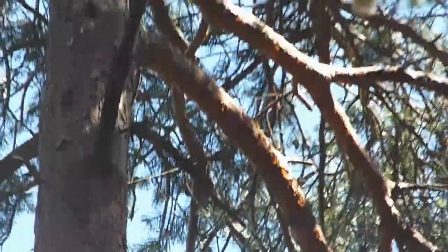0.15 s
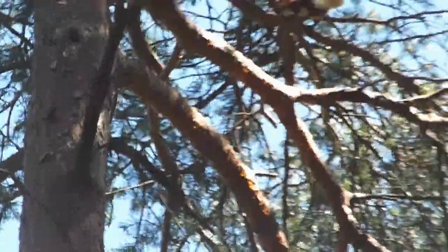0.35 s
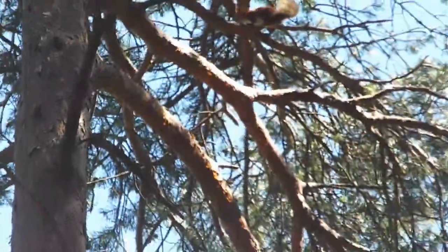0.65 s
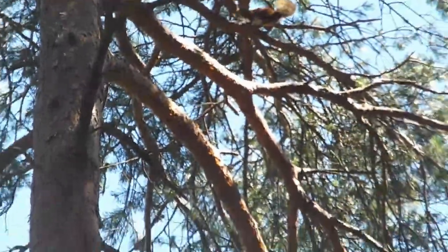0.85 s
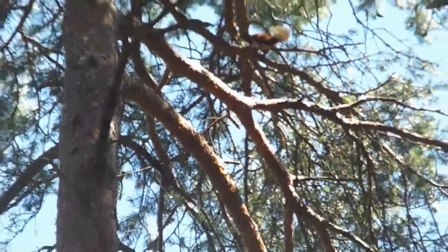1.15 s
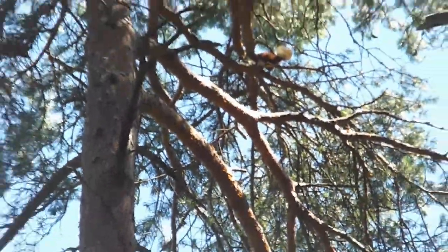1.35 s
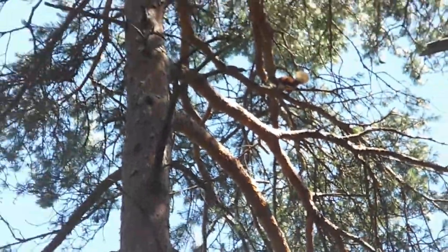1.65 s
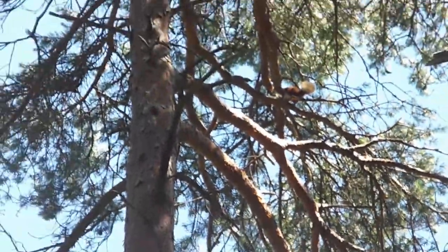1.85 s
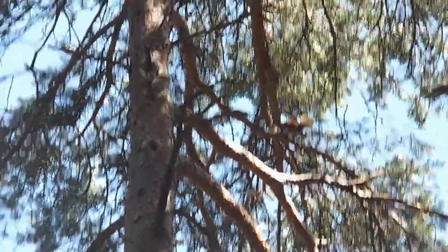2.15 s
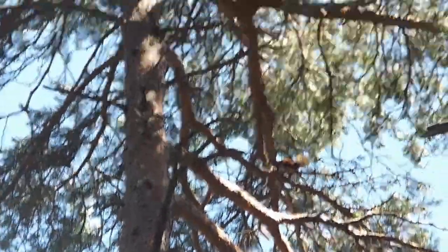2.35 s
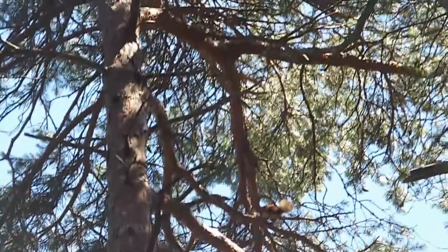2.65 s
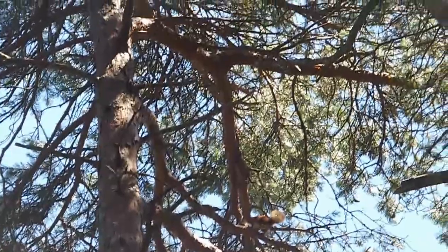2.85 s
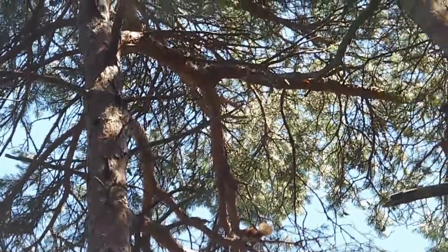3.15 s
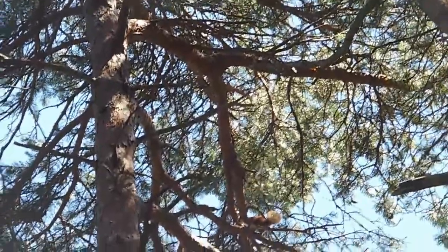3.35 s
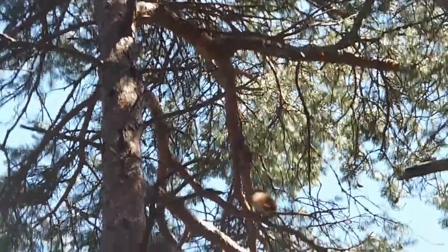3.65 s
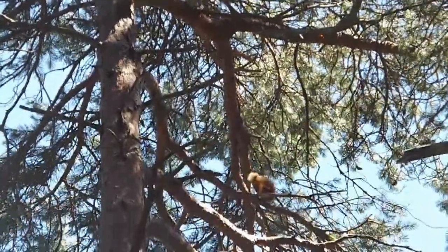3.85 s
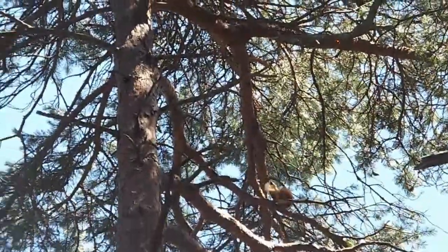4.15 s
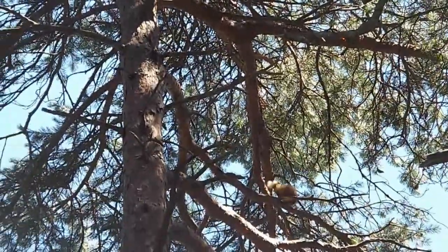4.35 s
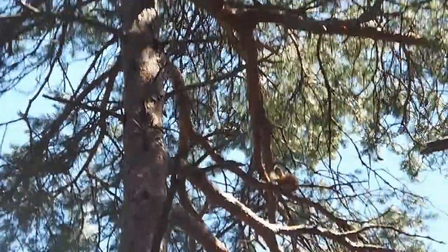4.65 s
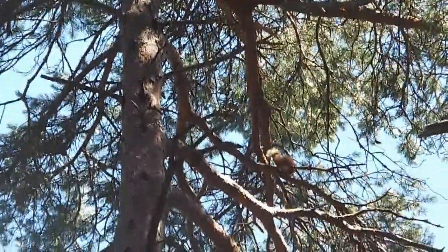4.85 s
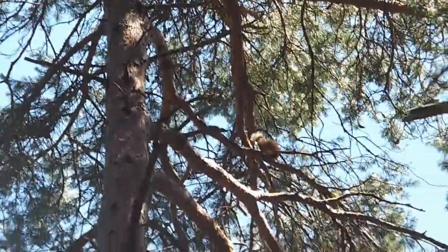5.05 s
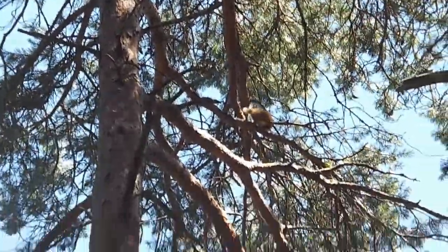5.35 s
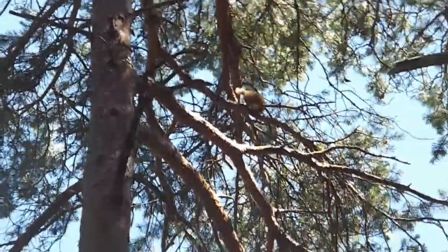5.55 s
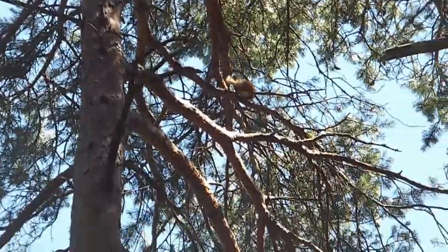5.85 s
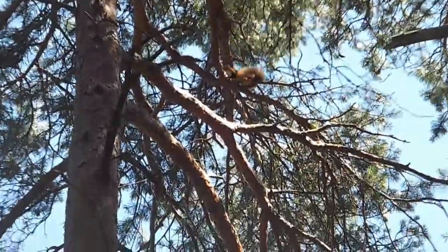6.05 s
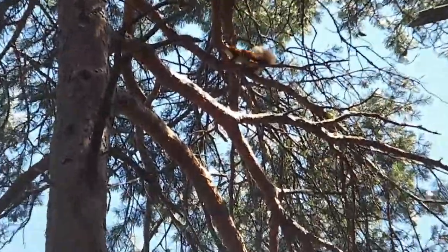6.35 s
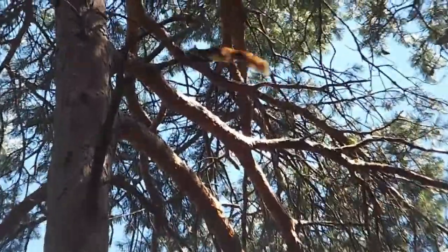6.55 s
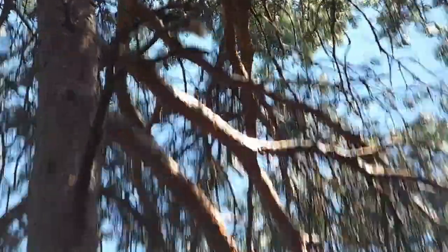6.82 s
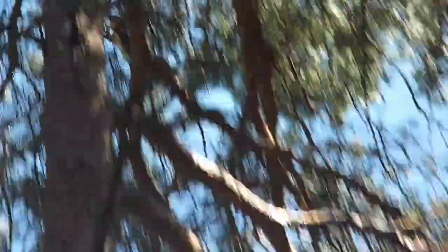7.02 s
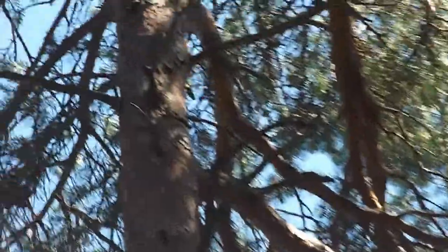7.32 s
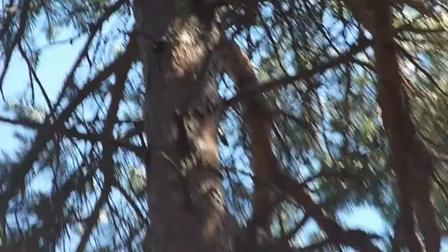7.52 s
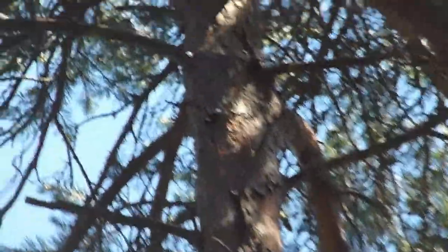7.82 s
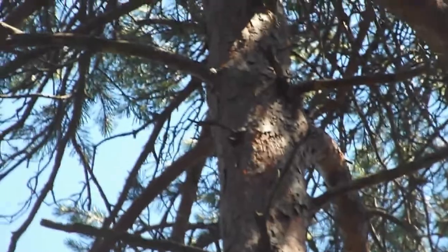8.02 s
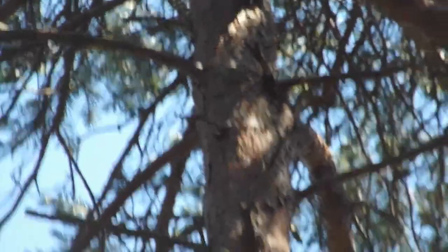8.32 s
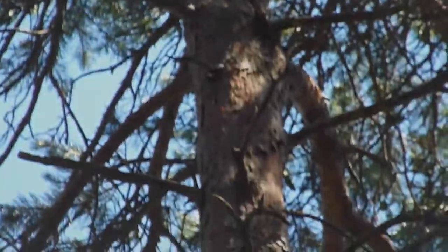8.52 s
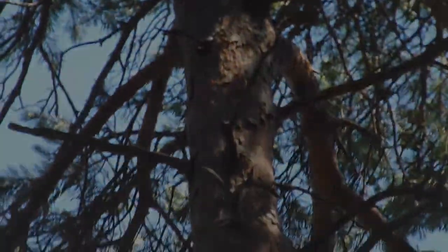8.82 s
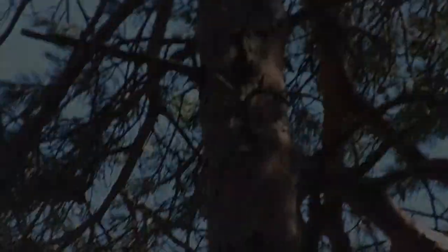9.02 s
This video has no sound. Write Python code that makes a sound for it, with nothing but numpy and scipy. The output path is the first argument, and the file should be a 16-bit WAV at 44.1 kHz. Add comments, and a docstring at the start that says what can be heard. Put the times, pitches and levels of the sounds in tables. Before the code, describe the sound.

Very close, a small lens motor whirs roughly with gritty gear ticks for about a second and a half, then stops. Thin high birds whistle with woodland echo over soft air and hiss while hands rub, bump and creak the plastic housing. The motor whirs again for nearly two seconds and ends in a loud sharp click, followed by light taps and birds.

```python
"""Under the pines a camera zooms out and back in: rough noise pulsed by gear teeth rings the lens barrel.
Gear ticks are short noise bursts; the end stop is a sharp, clipped click of struck modes.
The housing clicks, creaks, pings, rustles and thuds in the hand; a quiet harmonic buzz sets in late.
Small birds whistle thinly, as warbled sine glides with a noisy echo, over woodland air, hiss and whine."""
import sys
import numpy as np
from scipy import signal
from scipy.fft import rfft, irfft, next_fast_len
from scipy.io import wavfile
from scipy.ndimage import uniform_filter1d, map_coordinates

SR = 44100
rng = np.random.default_rng(int(sys.argv[2]) if len(sys.argv) > 2 else 0)


def int16_out(signal):
    """Quantize to a 16-bit WAV file."""
    q = np.round(np.clip(np.atleast_2d(signal).T, -1, 1) * 32767)
    wavfile.write(sys.argv[1], SR, q.astype(np.int16))


N = 404838
TOP_HZ = 15900  # band limit


def amp(db):
    """Decibels to gain."""
    return 10 ** (np.asarray(db) / 20)


def unit(x):
    """x at rms 1."""
    return x / np.sqrt(np.mean(x ** 2) + 1e-20)


def along(points, hz):
    """(Hz, value) points read on a log frequency axis."""
    f, v = np.transpose(points)
    return np.interp(np.log(hz + 1), np.log(f + 1), v)


def tilt(hz, db_per_octave):
    """Spectral slope in dB, flat below 800 Hz and above 8 kHz."""
    return db_per_octave * np.log2(np.clip(hz, 800, 8000))


def wobble(rate, size=N):
    """A smooth random curve, rate knots a second."""
    knots = rng.standard_normal(int(size * rate / SR) + 4)
    return map_coordinates(knots, [np.arange(size) * rate / SR])


def filtered(x, response):
    """x through a gain given as a function of frequency."""
    n = x.shape[-1]
    m = next_fast_len(n + 8192)
    return irfft(rfft(x, m) * response(np.fft.rfftfreq(m, 1 / SR)), m)[..., :n]


def noise(spectrum, size=N):
    """Two unrelated coloured noises, rms 1 over the pair."""
    white = rng.standard_normal((2, size))
    return unit(filtered(white, lambda hz: amp(along(spectrum, hz))))


def resonance(hz, centre, width):
    """Gain of one resonance with steep skirts."""
    return (hz * width) ** 2 / ((centre ** 2 - hz ** 2) ** 2 + (hz * width) ** 2)


def add(track, s, sound):
    """Mix a sound into a track at time s."""
    part = track[..., max(round(s * SR), 0):][..., :sound.shape[-1]]
    part += sound[..., :part.shape[-1]]


def no_bass(x, edge_hz=250):
    """High-pass: the small body radiates little low sound."""
    return signal.lfilter(*signal.butter(2, edge_hz, 'highpass', fs=SR), x)


def barrel(force):
    """The lens barrel carries vibration to each microphone with its own strengths."""
    # Barrel resonances. Each row: centre in Hz, width in Hz, left level in dB, right level in dB.
    barrel_modes = [(1000, 260, -11.5, -5), (1560, 1600, -10.5, -5), (2090, 190, 0, 0),
                    (2352, 290, 4, -2.5), (2810, 740, -3, -4), (3260, 1200, -10.5, -8.5),
                    (3964, 260, -18, -1.5), (4527, 470, -9.5, 1.5), (5670, 930, -13.5, -13),
                    (7060, 1230, -8.5, -2.5), (7660, 790, -6, -2.5), (8590, 990, -30, 1.5),
                    (9360, 900, -32, -0.5), (10600, 700, -18, -28), (11670, 950, -19.5, -14)]
    grid = np.linspace(0, SR / 2, 2048)
    power = 0
    for centre, width, left_db, right_db in barrel_modes:
        power = power + (amp([[left_db], [right_db]]) * resonance(grid, centre, width)) ** 2
    gains = np.sqrt(power)
    return unit(filtered(force, lambda hz: np.array([np.interp(hz, grid, side) for side in gains])))


def background():
    """Air in the trees, the idling lens drive, microphone hiss and a steady electronic whine."""
    # Air level over time. Each row: time in seconds, relative level in dB.
    air_levels = [(0.0, -59.5), (2.2, -61.5), (2.45, -60.5), (5.09, -61.5), (5.47, -60), (5.88, -62.5),
                  (6.26, -60.5), (9.18, -61)]
    # Air spectrum. Each row: frequency in Hz, density in dB per Hz.
    breeze_spectrum = [(25, -23), (80, -17), (150, -11), (250, -4), (450, 1), (800, 0), (1300, -4.5),
                       (2500, -13), (5000, -20), (10000, -17.5)]
    # Microphone self-noise spectrum. Each row: frequency in Hz, density in dB per Hz.
    hiss_spectrum = [(100, -3.5), (3000, 10.5), (7000, 5.5), (9000, 5.5), (12000, 2), (16000, -1.5)]
    # Left-right likeness of the air. Each row: frequency in Hz, correlation from -1 to 1.
    likeness = [(60, 0.82), (180, 0.93), (550, 0.72), (1650, 0.59), (4970, 0.35), (15000, -0.34)]
    t = np.arange(N) / SR

    def mid_side_gains(hz):
        angle = np.arccos(np.clip(along(likeness, hz), -1, 1)) / 2
        return np.array([np.cos(angle), np.sin(angle)])

    mid, side = filtered(noise(breeze_spectrum), mid_side_gains)
    air_db = np.interp(t, *np.transpose(air_levels)) + 4 + 0.88 * wobble(9.2)
    air = unit(np.array([mid + side, mid - side])) * amp(air_db)
    idle = amp(-64.0 + 2.4 * wobble(7.2)) * barrel(rng.standard_normal((2, N)))
    whine_hz = 11719 + 6 * wobble(30)
    whine = amp(-77) * np.sin(2 * np.pi * np.cumsum(whine_hz) / SR)
    return air + idle + amp(-57.5) * noise(hiss_spectrum) + whine


def buzz():
    """A quiet, even buzz: 13 harmonics of a slightly unsteady pitch."""
    # The buzz: start in seconds, pitch in Hz, relative level in dB.
    buzz_settings = (9.11, 274.5, -62.5)
    # Harmonic levels. Each row: frequency in Hz, level in dB.
    buzz_colour = [(275, 0), (820, -0.5), (1100, -4), (1400, -8), (1900, -8), (3200, -9), (4000, -20)]
    start, pitch_hz, db = buzz_settings
    t = np.arange(N) / SR
    turns = np.cumsum(pitch_hz * (1 + 0.0024 * wobble(30))) / SR
    tone = np.zeros(N)
    for k in range(1, 14):
        tone += amp(along(buzz_colour, k * pitch_hz)) * np.sin(2 * np.pi * (k * turns + rng.random()))
    return amp(db + 3.5) * tone * np.clip((t - start) / 0.03, 0, 1)


def note(length, first_hz, last_hz, depth_hz):
    """A thin sliding whistle with a quick warble and a finer random tremor."""
    warble_hz, tremor_hz, tremor_rate = 36.4, 30, 480  # mean rate; depth; knots a second
    u = np.linspace(0, 1, int(length * SR))
    cycles = warble_hz * rng.normal(1, 0.146) * length * u
    warble = np.sin(2 * np.pi * (cycles + rng.random()))
    tremor = tremor_hz * wobble(tremor_rate, size=SR)[:len(u)]
    pitch_hz = first_hz + (last_hz - first_hz) * u ** 0.87 + depth_hz * warble + tremor
    swell = np.sqrt(np.abs(np.sin(np.pi * u))) * amp(2.4 * wobble(95, size=SR)[:len(u)])
    return swell * np.sin(2 * np.pi * np.cumsum(pitch_hz) / SR)


def birds(wet_db=-6, t60=0.77):
    """Near notes and fainter answers, echoed by the trunks, over a band of distant calls."""
    # Nearest notes. Each row: start in seconds, length in seconds, first pitch in Hz, last pitch in Hz,
    # warble depth in Hz, level in dB.
    near_notes = [(0.836, 0.23, 7740, 7400, 70, -48.5), (1.878, 0.089, 4560, 4280, 40, -63),
                  (1.97, 0.14, 4220, 4060, 35, -69), (2.125, 0.14, 7320, 7120, 20, -56),
                  (2.31, 0.08, 7600, 7260, 120, -62), (2.39, 0.073, 7150, 7020, 30, -64),
                  (2.47, 0.056, 6750, 6350, 110, -61), (2.568, 0.077, 6950, 6480, 60, -57),
                  (2.643, 0.12, 7260, 6880, 45, -63), (2.809, 0.05, 6900, 7130, 60, -53),
                  (2.816, 0.09, 7650, 7100, 190, -57), (3.016, 0.1, 7000, 6800, 42, -58),
                  (3.03, 0.056, 7550, 7350, 140, -63), (3.197, 0.065, 8050, 7980, 25, -62),
                  (3.243, 0.07, 7000, 6780, 40, -60), (3.25, 0.15, 7360, 7400, 20, -65),
                  (3.415, 0.12, 7430, 7100, 15, -55), (3.65, 0.12, 7400, 7280, 20, -61.5),
                  (3.653, 0.06, 7700, 8100, 170, -58), (3.798, 0.16, 7900, 7630, 100, -62),
                  (4.01, 0.11, 7650, 7240, 70, -75), (4.285, 0.05, 7750, 7620, 60, -68),
                  (4.29, 0.12, 6950, 6830, 90, -69), (4.665, 0.044, 7950, 7600, 90, -57),
                  (4.694, 0.078, 7500, 7260, 70, -56), (4.817, 0.11, 7620, 7030, 110, -49.5),
                  (4.975, 0.11, 7420, 6950, 104, -50.5), (5.118, 0.096, 7540, 6980, 120, -51.5),
                  (5.284, 0.091, 7350, 7020, 74, -59), (5.48, 0.11, 7700, 7400, 90, -61),
                  (5.64, 0.11, 7700, 7400, 90, -65), (5.771, 0.15, 7450, 7260, 80, -67),
                  (8.037, 0.034, 7200, 6600, 55, -54), (8.094, 0.037, 7650, 7460, 110, -56),
                  (8.136, 0.066, 7150, 7000, 50, -54.5), (8.251, 0.12, 7480, 6760, 64, -54),
                  (8.606, 0.053, 7900, 7200, 150, -59), (8.8, 0.059, 7460, 7700, 110, -58),
                  (9.048, 0.12, 7480, 7200, 52, -53)]
    gap_s, length_s = 0.11, 0.0926
    start_hz, spread_hz, fall_hz, depth_hz = 7320, 250, 301, 90
    flock_db, scatter_db = -63, 4
    song = np.zeros(N)
    for s, length, first_hz, last_hz, warble_depth_hz, db in near_notes:
        add(song, s, amp(db) * note(length, first_hz, last_hz, warble_depth_hz))
    for k, (late, high, loud) in enumerate(rng.standard_normal(size=(90, 3))):
        hz = start_hz + spread_hz * high
        answer = note(length_s, hz, hz - fall_hz, depth_hz)
        add(song, gap_s * (k + 0.38 * late), amp(flock_db + scatter_db * loud) * answer)
    t = np.arange(SR // 2) / SR
    tail = rng.standard_normal((2, len(t))) * amp(-60 * t / t60)
    echo = signal.fftconvolve(song[None], tail / np.linalg.norm(tail[0]), axes=1)[:, :N]
    far_spectrum = [(5500, -32), (6500, -9), (7050, -9.5), (7600, -8.5), (8500, -52)]
    far_calls = amp(-64.5 + 1.3 * wobble(12.0)) * noise(far_spectrum)
    return song + amp(wet_db) * echo + far_calls


def rubs():
    """Skin slips on the grip: soft, uneven swells of coloured noise."""
    # Slips. Each row: start in seconds, relative level in dB.
    slips = [(1.86, -54), (2.267, -52), (2.35, -53.5), (2.45, -58), (2.657, -57.5), (3.583, -53),
             (3.71, -52.5), (4.534, -53)]
    spectrum = [(120, -18), (400, 5.0), (950, 8.5), (1500, -3), (2500, -3.5), (6000, -11), (14000, -23)]
    out = np.zeros(N)
    size = int(0.1 * SR)  # 0.1 s a slip
    for s, db in slips:
        swell = unit(amp(2.5 * wobble(90, size=size)) * np.hanning(size) ** .5)
        add(out, s, amp(db - 6.5) * swell * noise(spectrum, size=size)[0])
    return out


def bumps(t60=0.019):
    """Soft bumps of the hand: dull noise thuds that decay fast."""
    # Bumps. Each row: start in seconds, relative level in dB.
    hand_bumps = [(2.443, -46.5), (2.509, -41), (2.566, -45), (2.724, -46)]
    spectrum = [(100, -40), (330, 5), (600, 18), (1000, -37), (2500, -54)]
    out = np.zeros(N)
    t = np.arange(SR // 12) / SR
    for s, db in hand_bumps:
        thud = noise(spectrum, size=len(t))[0]
        envelope = amp(-60 * t / t60) * (1 - np.exp(-t / 0.0014))
        add(out, s, amp(db - 15.0) * unit(thud * envelope))
    return no_bass(out)


def pings():
    """A slack gear wheel and other loose parts each ring as one decaying sine."""
    # Loose parts. Each row: start in seconds, pitch in Hz, level in dB, t60 in seconds.
    loose_parts = [(5.059, 3080, -45, 0.26), (5.943, 1970, -28.5, 0.04), (8.034, 1150, -40, 0.036),
                   (8.035, 670, -47.5, 0.16)]
    # Slack wheel. Each row: start in seconds, level in dB.
    wheel_rings = [(0.507, -23.5), (0.617, -27), (0.836, -29), (0.859, -27), (1.164, -25), (1.191, -21.5),
                   (1.303, -25), (1.524, -23.5), (1.578, -28)]
    wheel_hz, wheel_t60_s = 2310, 0.015
    out = np.zeros(N)
    t = np.arange(SR // 4) / SR
    wheel = [(s, wheel_hz * rng.normal(1, 0.03), db, wheel_t60_s) for s, db in wheel_rings]
    for s, hz, db, t60 in wheel + loose_parts:
        envelope = amp(db - 60 * t / t60) * (1 - np.exp(-t / 0.0012))
        add(out, s, envelope * np.sin(2 * np.pi * hz * t))
    return out


def strike(modes, spectrum, crack_db, crack_t60, scatter_db):
    """One contact of plastic parts: a crack and the modes it rings, rms 1 in each channel."""
    t = np.arange(SR // 12) / SR
    hit = amp(crack_db - 60 * t / crack_t60) * noise(spectrum, size=len(t))
    for hz, left_db, right_db, t60 in modes:
        # channel phases spread apart as the mode rises
        phase = rng.random() + min(hz / 6000, 1) * rng.random((2, 1))
        mode_db = np.array([[left_db], [right_db]]) + scatter_db * rng.standard_normal()
        mode_hz = hz * rng.normal(1, 0.019)
        hit += amp(mode_db - 60 * t / t60) * np.sin(2 * np.pi * (mode_hz * t + phase))
    return np.array([unit(side) for side in hit * (1 - np.exp(-t / 0.0001))])


def click(db, tilt_db, pan_db, lowest_hz, highest_hz, rebound_db):
    """A part grazes, strikes the housing and rebounds twice, within the tap's own band."""
    # Housing modes. Each row: frequency in Hz, left level in dB, right level in dB, t60 in seconds.
    housing_modes = [(927, -4, -3.5, 0.036), (1180, -9, 0, 0.02), (1442, -16, -5, 0.052),
                     (1790, -8.5, -15, 0.037), (2340, 8.5, -16, 0.038), (2700, 6.5, 1, 0.023),
                     (3160, -4, 11.5, 0.0068), (4030, 5, -10, 0.016), (4260, 7.5, 4.5, 0.017),
                     (4820, -5, 2, 0.017), (5790, 9, -11, 0.0095), (6830, 21.5, 13.5, 0.007),
                     (8540, 5, 2, 0.012), (9570, -7, 21, 0.0077)]
    # Crack spectrum. Each row: frequency in Hz, density in dB per Hz.
    crack_spectrum = [(100, -45), (450, -50), (850, -1), (2500, -2.5), (3600, -4.5), (5200, -27),
                      (6200, -1), (9500, 8), (10500, -44), (12000, -25), (16000, -51)]
    # Housing response. Each row: frequency in Hz, gain in dB.
    housing_colour = [(150, -18), (880, 1.5), (1200, -4), (1700, 3), (2400, -1.5), (3200, -2), (4200, -4.5),
                      (5200, 5.5), (6500, -2), (9500, -11.5), (14000, 1)]
    # Flight before each landing: shortest in seconds, longest in seconds.
    flight_range_s = (0.0022, 0.007)
    lead = int(0.00123 * SR)  # graze to seating
    ring = strike(housing_modes, crack_spectrum, crack_db=14.5, crack_t60=0.019, scatter_db=-1)
    ring = np.pad(ring, [(0, 0), (0, SR // 25)])
    hit = amp(-20) * ring + np.roll(ring, lead, axis=1)
    for k, landing_s in enumerate(np.cumsum(rng.uniform(*flight_range_s, size=2))):
        hit += amp(rebound_db - 2.5 * k) * np.roll(ring, lead + int(SR * landing_s), axis=1)
    hit = filtered(hit, lambda hz: amp(along(housing_colour, hz) + tilt(hz, tilt_db)))
    band_hz = [lowest_hz, min(highest_hz, TOP_HZ)]
    hit = signal.lfilter(*signal.butter(2, band_hz, 'bandpass', fs=SR), hit)
    peak = np.sqrt(uniform_filter1d(np.mean(hit ** 2, axis=0), size=64).max())  # short-term rms
    return amp(db - 6.0) * hit / peak * amp([[pan_db / 2], [-pan_db / 2]])


def clicks():
    """Single taps from all over the housing, each with its own band and pan."""
    # Taps. Each row: start in seconds, relative level in dB, brightness in dB per octave,
    # left minus right in dB, lower band edge in Hz, upper band edge in Hz.
    taps = [(1.344, -13.5, -0.5, -2.5, 750, 14000), (1.87, -38, 2, -10, 300, 11000),
            (1.928, -38, 7, -7, 300, 11000), (1.941, -35.5, -3.5, -7, 1200, 11000),
            (3.589, -36, -2.5, -4, 400, 11000), (3.752, -40, 8, -8, 400, 11000),
            (4.548, -35.5, 0, -8, 400, 11000), (4.693, -34.5, -2.5, -1, 400, 11000),
            (5.026, -36, -10.5, -2, 400, 3000), (5.054, -28, -2.5, -5, 1100, 11000),
            (5.576, -37, 2, -9, 400, 11000), (5.637, -32, 3.5, 5, 800, 11000),
            (7.513, -23.5, 1, -11, 1300, 9000), (7.704, -23, -0.5, -3, 900, 10000),
            (8.032, -28.5, -1.5, -8.5, 650, 3500), (8.777, -35, -2, 1, 1300, 2800),
            (8.856, -20.5, -0.5, 2, 1600, 9400), (9.036, -32, 0, -1, 1690, 2900)]
    out = np.zeros((2, N))
    for s, db, tilt_db, pan_db, lowest_hz, highest_hz in taps:
        add(out, s, click(db, tilt_db, pan_db, lowest_hz, highest_hz, rebound_db=-18.0))
    return out


def creak(snap_t60=0.012, tail_t60=0.044, tail_db=-13, attack_s=0.00073):
    """Each slip snaps a seam, knocks the shell and leaves its dense upper modes ringing briefly."""
    # Slips of one seam. Each row: start in seconds, relative level in dB, brightness in dB per octave.
    seam_slips = [(5.269, -30, 9), (5.273, -25.5, -5.5), (5.311, -21.5, 1), (5.3704, -16.5, 1),
                  (5.3765, -23, 1), (5.405, -16, 0), (5.413, -26, -2), (5.417, -27, 1), (5.434, -36, 8),
                  (5.4433, -15, 1), (5.451, -26.5, -4), (5.493, -16, 0.5)]
    # Snap spectrum. Each row: frequency in Hz, density in dB per Hz.
    snap_spectrum = [(150, -42), (550, -23), (900, -7), (1200, -13), (1550, 1.5), (2300, 0.5), (3000, 5.5),
                     (3600, -0.5), (4400, 1.5), (5100, 2), (5600, -4), (6300, -9), (9500, -4.5),
                     (11000, -20), (16000, -37)]
    # Shell ringing spectrum. Each row: frequency in Hz, density in dB per Hz.
    tail_spectrum = [(150, -35), (600, -22), (880, -1), (1150, -6), (1500, 6), (2600, 3), (3800, -5),
                     (5200, -1), (6200, -22), (14000, -42)]
    shell_hz, shell_db, shell_t60_s = 923, -18, 0.037  # hollow knock
    pan_db = -5.5  # left minus right
    out = np.zeros((2, N))
    t = np.arange(SR // 12) / SR
    for s, db, tilt_db in seam_slips:
        snap = noise(snap_spectrum, size=len(t)) * amp(-60 * t / snap_t60)
        tail = noise(tail_spectrum, size=len(t)) * amp(tail_db - 60 * t / tail_t60)
        knock_hz = shell_hz * rng.normal(1, 0.02)
        knock = amp(shell_db - 60 * t / shell_t60_s) * np.sin(2 * np.pi * knock_hz * t)
        contact = filtered(snap + tail + knock, lambda hz: amp(tilt(hz, tilt_db)))
        slip = np.array([unit(side) for side in contact * (1 - np.exp(-t / attack_s))])
        add(out, s, amp(db - 23.5) * slip)
    out = filtered(out, lambda hz: amp(along([(100, -24), (500, 5), (800, 0)], hz)))
    return out * amp([[pan_db / 2], [-pan_db / 2]])


def end_stop():
    """The lens group hits its stop and rebounds, louder on the right; peaks clip as in an overload."""
    # Contacts. Each row: start in seconds, relative level in dB.
    contacts = [(7.7939, -1.5), (7.7952, -7.5), (7.7996, -17)]
    # Stop modes. Each row: frequency in Hz, left level in dB, right level in dB, t60 in seconds.
    stop_modes = [(885, -6, -18, 0.029), (1250, -26, -20, 0.024), (1840, -17, -12, 0.048),
                  (2450, -1, -14, 0.032), (2720, -7, 2, 0.022), (3010, -14, -0.5, 0.026),
                  (3690, -8, -12, 0.015), (4490, -8, 9, 0.012), (5330, -12, -4, 0.023),
                  (6700, 12, 0, 0.015), (6870, 1, 1, 0.019), (7280, -3, 0, 0.012), (8360, 8, 6, 0.0096),
                  (8650, -1, 5, 0.0084), (9090, -10, 6, 0.012), (11050, -14, -3, 0.0038)]
    # Crack spectrum. Each row: frequency in Hz, density in dB per Hz.
    stop_crack = [(60, -30), (450, -18), (900, -2.5), (1900, -3), (3200, -1), (6000, -0.5), (9000, 3.5),
                  (10200, -9.5), (12000, -10.5), (16000, -22)]
    response = [(40, -14), (150, -6), (400, -8), (800, 0.5), (12000, 0.0), (16000, -1)]
    out = np.zeros((2, N))
    for s, db in contacts:
        contact = strike(stop_modes, stop_crack, crack_db=8, crack_t60=.013, scatter_db=1)
        add(out, s, amp(db - 22.0) * amp([[-2.5], [2.5]]) * contact)
    overloaded = np.clip(out, -.8, .8)
    return filtered(overloaded, lambda hz: amp(along(response, hz)))


def gear_ticks(t60=0.023, attack_s=0.00049):
    """A tooth catches: a dry noise tick that the greased gear train damps quickly."""
    # Catches. Each row: start in seconds, relative level in dB, brightness in dB per octave.
    catches = [(0.081, -28.5, -4), (0.197, -29, 3), (0.272, -23.5, -2.5), (0.46, -24.5, -1),
               (0.506, -29, 2), (0.616, -28.5, 6), (0.795, -24.5, -3.5), (0.976, -31.5, -7),
               (1.315, -30, -1), (1.677, -20.5, 9), (1.683, -27, 15), (1.703, -27.5, 4.5),
               (5.927, -28.5, -1), (5.944, -23, -1), (6.06, -32, -1.5), (6.222, -29.5, -1),
               (6.414, -24.5, -2), (6.504, -21.5, 37), (6.604, -31.5, -1.5), (6.772, -27.5, -3),
               (6.950, -26.5, -3), (7.137, -27, 0.5), (7.331, -28.5, 1.5), (7.677, -28, -3)]
    # Tick spectrum. Each row: frequency in Hz, density in dB per Hz.
    tick_spectrum = [(150, -34), (500, -22), (850, -2), (1400, 2), (1800, -1), (2400, 5), (3300, 2),
                     (3800, -5), (5000, -14), (7500, -5), (10000, -9), (13000, -40)]
    pan_db = -7  # left minus right
    out = np.zeros((2, N))
    t = np.arange(SR // 20) / SR
    envelope = amp(-60 * t / t60) * (1 - np.exp(-t / attack_s))
    for s, db, tilt_db in catches:
        grit = filtered(noise(tick_spectrum, size=len(t)), lambda hz: amp(tilt(hz, tilt_db)))
        add(out, s, amp(db - 21.5) * unit(unit(grit) * envelope))
    return no_bass(out) * amp([[pan_db / 2], [-pan_db / 2]])


def gear_force(turns, mesh_depth, shaft_depth, rough_db, snag_db):
    """Rubbing noise that peaks as each of six teeth engages, catches once a turn and snags at random."""
    teeth = np.cos(2 * np.pi * 6 * turns)
    catch = np.exp(4 * (np.cos(2 * np.pi * turns) - 1))
    snags = np.clip(wobble(110), .5, 2.4)
    roughness = amp(rough_db * wobble(900) + snag_db * snags)
    pressure = np.exp(mesh_depth * teeth + shaft_depth * catch) * roughness
    return pressure * rng.standard_normal((2, N))


def motor(shaft_hz=36):
    """The gear train whirs through the barrel, its slack chatters and the lens guide buzzes."""
    # Motor runs. Each row: start in seconds, stop in seconds.
    run_times = [(0, 1.583), (1.671, 1.72), (1.725, 1.777), (5.928, 7.79), (7.81, 7.88)]
    # The same runs. Each row: whir, gear chatter and lens guide buzz as relative levels in dB,
    # level change over the run in dB.
    run_levels = [(-46, -51, -88, 0), (-46.5, -49.5, -65, -6), (-53.5, -57, -61, 6), (-46, -50.5, -61.5, 0),
                  (-49.5, -52.5, -53.5, 6.5)]
    t = np.arange(N) / SR
    gains = np.zeros((3, N))
    for (start, stop), (*layers_db, change_db) in zip(run_times, run_levels):
        running = np.interp(t, [start - .005, start, stop, stop + .01], [0, 1, 1, 0])
        drift = np.interp(t, [start, stop], amp([-change_db / 2, change_db / 2]))
        gains += amp(layers_db)[:, None] * running * drift
    turns = np.cumsum(shaft_hz * (1 + 0.01054 * wobble(5.5))) / SR
    whir_force = gear_force(turns, mesh_depth=0.15, shaft_depth=0.4, rough_db=1.7, snag_db=1.5)
    chatter_force = gear_force(turns, mesh_depth=0.22, shaft_depth=0.12, rough_db=1.8, snag_db=2.2)

    def upper(hz):  # crossover at 3400 Hz
        return 1 / (1 + (3400 / (hz + 1)) ** 12)

    whir = unit(filtered(barrel(whir_force), upper))
    chatter = unit(filtered(barrel(chatter_force), lambda hz: 1 - upper(hz)))
    guide_buzz = unit(filtered(whir_force, lambda hz: resonance(hz, 2990, 560)))
    return amp(2.0) * gains[0] * whir + amp(4.0) * gains[1] * chatter + gains[2] * guide_buzz


def scene():
    """The camera's own noises over the wood."""
    surroundings = background() + buzz() + birds()
    handling = rubs() + bumps() + pings() + clicks() + creak()
    lens_drive = end_stop() + gear_ticks() + motor()
    return surroundings + handling + lens_drive


def record(dry):
    """The camera keeps nothing above its band limit."""
    return filtered(dry, lambda hz: hz < TOP_HZ)


dry = scene()
out = record(dry)
int16_out(out)
```